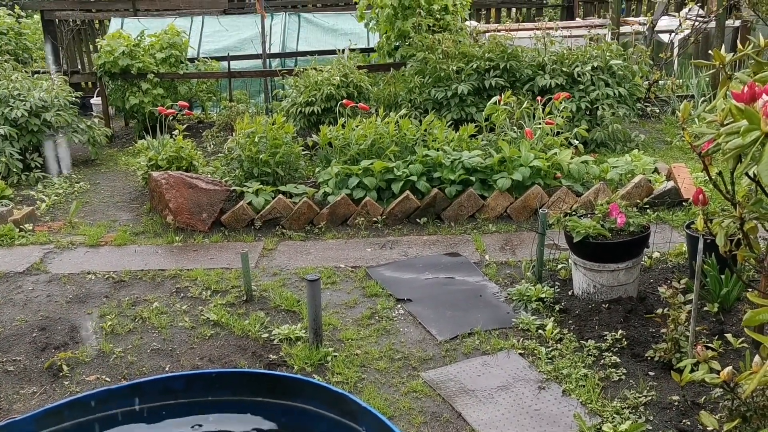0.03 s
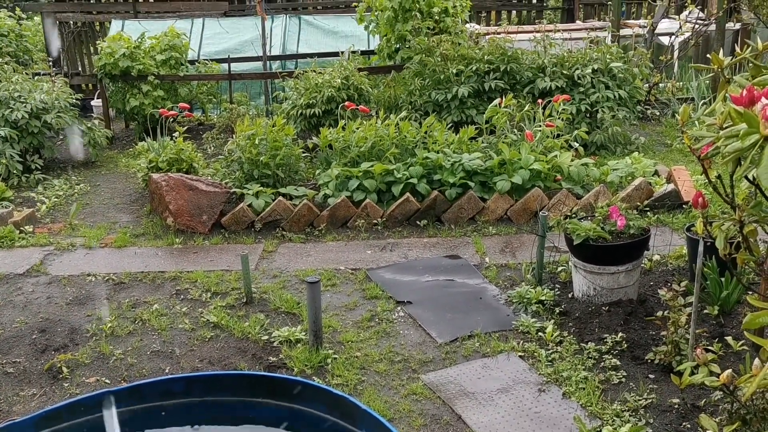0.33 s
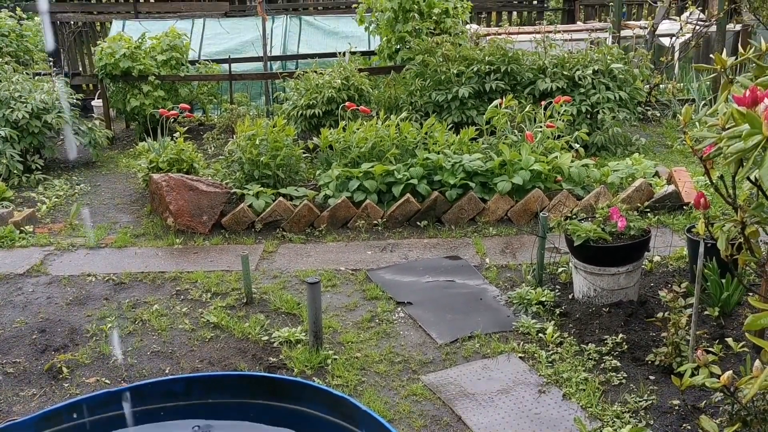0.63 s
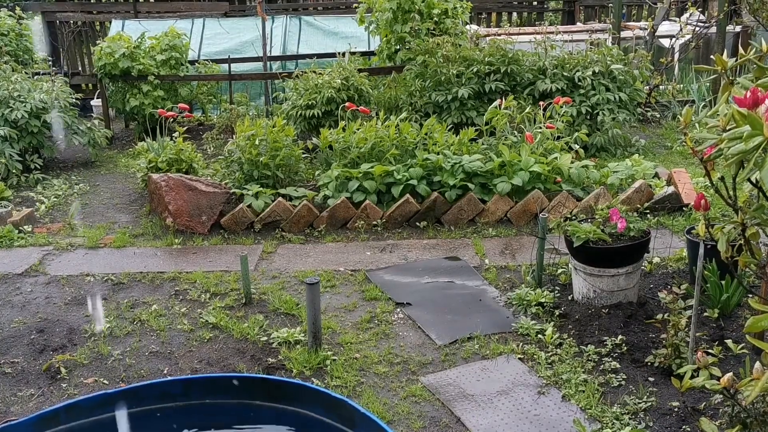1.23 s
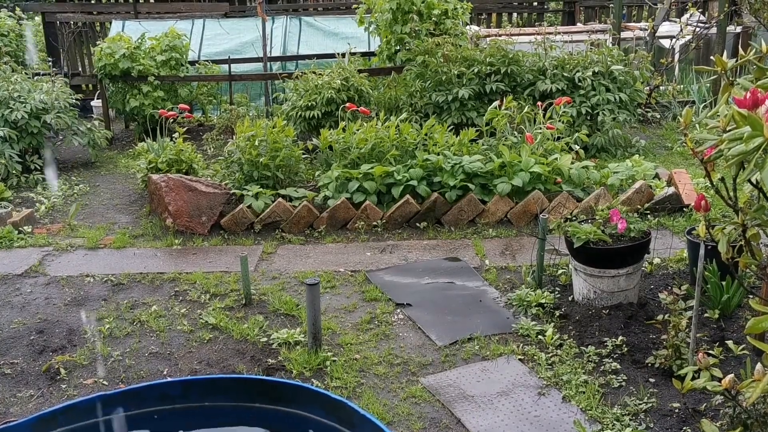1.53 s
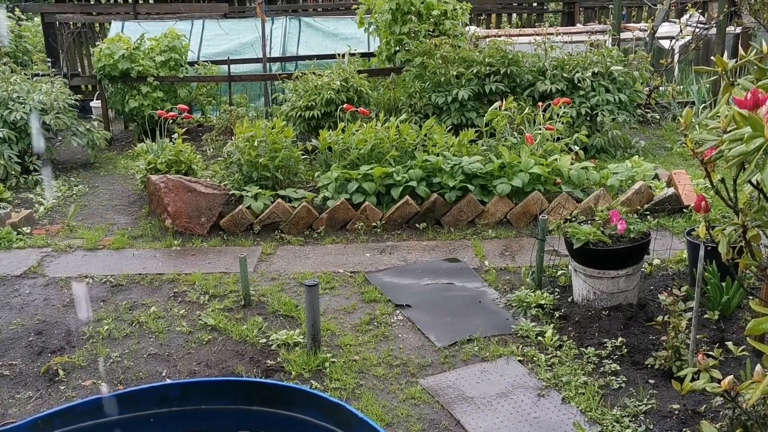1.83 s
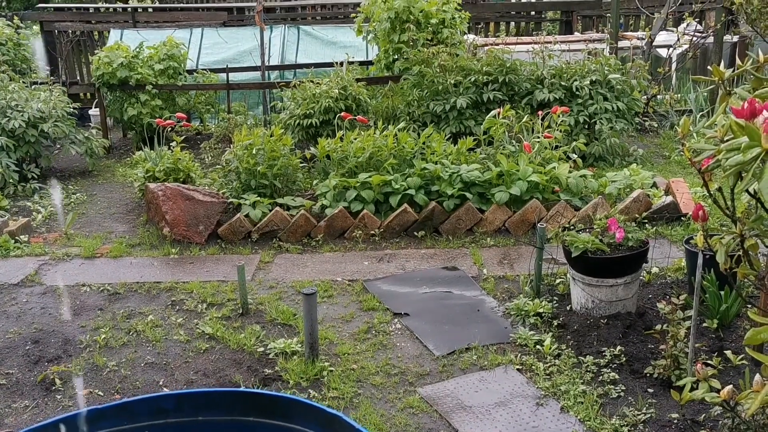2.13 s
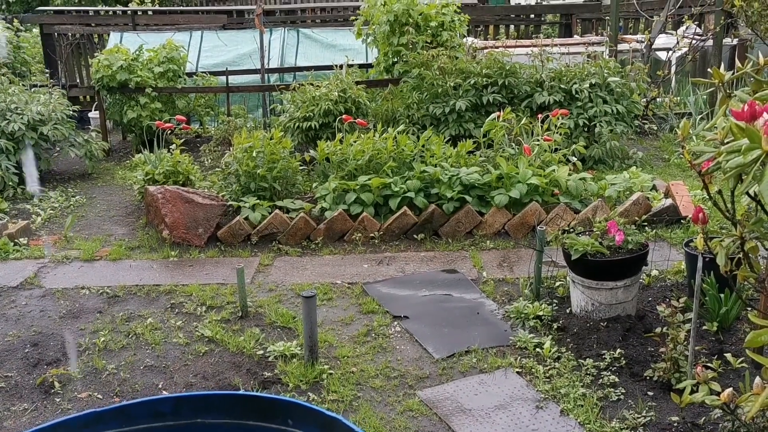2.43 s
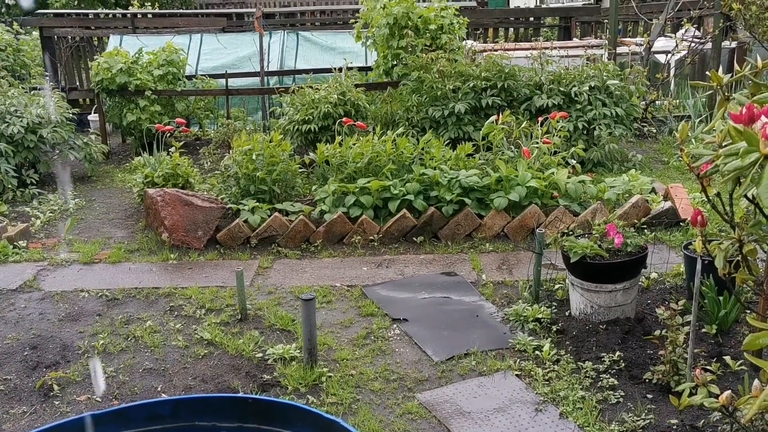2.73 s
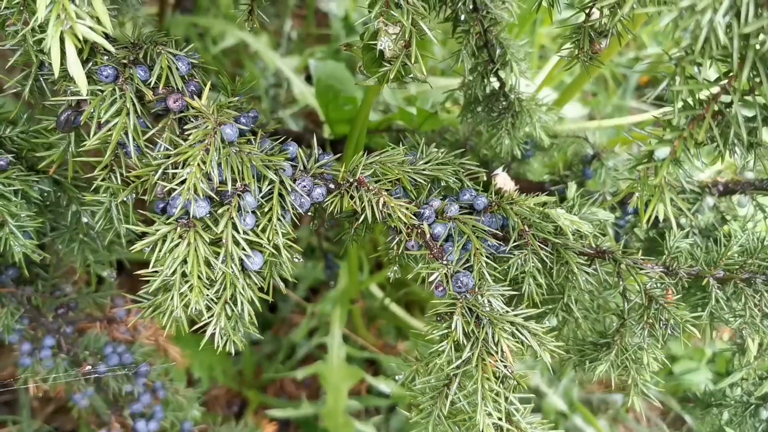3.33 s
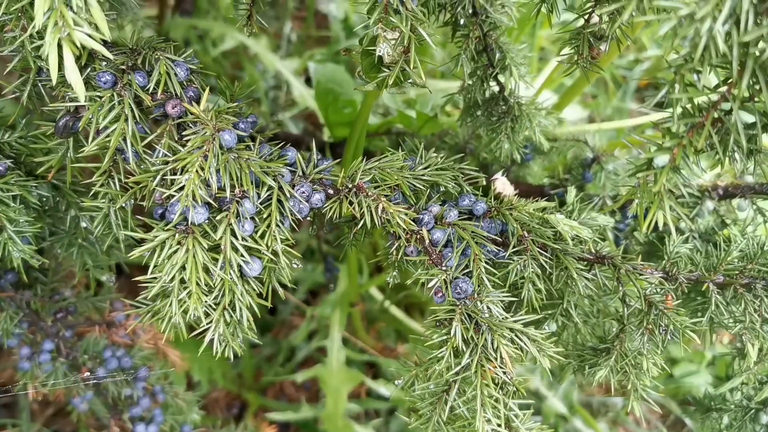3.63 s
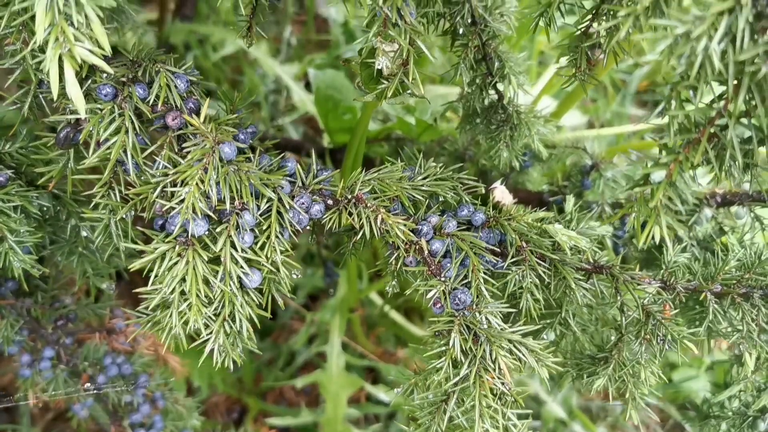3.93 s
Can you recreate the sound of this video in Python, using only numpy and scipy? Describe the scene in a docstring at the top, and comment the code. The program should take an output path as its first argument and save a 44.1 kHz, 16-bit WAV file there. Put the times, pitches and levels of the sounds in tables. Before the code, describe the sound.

Water drips and splatters close by into a full rain barrel, with sharp splashes and small bubbly plops over light garden rain. After a brief silence, soft steady rain patters on shrubs over a low breeze.

```python
"""Sharp, close splashes: roof runoff splatters into a full rain barrel. Each drop is a burst of noise
and the ping of a tiny trapped bubble; larger bubbles plop, mostly bending upward, amid ticks and fine
spray. Light rain and a low outdoor rumble sit behind. Near 3 s it all fades quickly into a short
silence, then soft steady rain on shrubs comes in, mostly to the right: hiss, fine patter and a few
drops pinging on leaves over a low breeze."""
import sys
import numpy as np
from scipy import signal
from scipy.fft import rfft, irfft
from scipy.io import wavfile

SR = 44100
rng = np.random.default_rng(int(sys.argv[2]) if len(sys.argv) > 2 else 0)


def dump(signal):
    """Clip the signal to [-1, 1] and save it as 16-bit WAV at the path in sys.argv[1]."""
    limited = np.clip(np.atleast_2d(signal).T, -1, 1)
    pcm = np.round(limited * 32767).astype(np.int16)
    wavfile.write(sys.argv[1], SR, pcm)


N = 176400
TIME = np.arange(N) / SR

# Full drops on the water: start_s, level_db, bubble_hz, slap_db, splat_db, tick_db, spray_db
# (the last four are frequency bands, low to high, relative to level_db)
BARREL_DROPS = [(0.065, -23.5, 2700, -9.5, -8, -22, -19), (0.1136, -47.5, 2970, 10, -6.5, -6, -3),
                (0.1434, -14.5, 3950, -19, -11, -18, -23), (0.2262, -28.5, 2080, -12.5, -13, -15, -18),
                (0.2902, -17.5, 5500, -24, -18.5, -16, -19), (0.3136, -19, 2650, -14, -15, -18.5, -22),
                (0.3413, -24.5, 2600, -16.5, -27, -20, -14.5), (0.387, -37, 1970, -9, -16, -27, -12),
                (0.485, -26.5, 4070, -13.5, -9, -14, -33), (0.5032, -23, 4760, -14, -12.5, -12.5, -34),
                (0.5229, -32, 2320, -4.5, -13, -25, -28), (0.6065, -27.5, 2660, -5.5, -25, -13.5, -18),
                (0.6235, -27.5, 2560, -13, -10.5, -18, -18), (0.638, -29.5, 2310, -14.5, -14, -27, -8),
                (0.683, -26, 2570, -7, -22, -33, -6), (0.7051, -31.5, 2390, -2, -26, -22, -18),
                (0.711, -31, 3360, -16, -6, -9, -13), (0.7333, -20.5, 3370, -30.5, -31, -16, -13.5),
                (0.7732, -25.5, 5100, -22.5, -16, -11, -14), (0.7912, -26.5, 3320, -9, -11, -13, -13.5),
                (0.8154, -27.5, 2550, -14, -20, -12, -12.5), (0.8826, -22, 4010, -13, -10, -31, -15.5),
                (0.903, -26, 3980, -24, -9.5, -10.5, -15), (0.9236, -25, 3470, -11, -8.5, -34, -18),
                (0.962, -27, 1480, -12, -26, -25.5, -13.5), (0.971, -25.5, 2390, -15, -14, -5.5, -20),
                (1.0165, -19, 3350, -22, -18.5, -15.5, -16), (1.0691, -35.5, 2490, -2.5, -29, -16, -9),
                (1.118, -21, 2620, -16, -27, -19, -12.5), (1.2077, -29.5, 2250, -6.5, -9, -9, -22),
                (1.2198, -28.5, 3450, -13.5, -10, -4.5, -9), (1.2411, -38.5, 3360, -15, 0.5, 0, -5),
                (1.267, -32, 4070, -18, -10, -13, -10), (1.316, -28, 4100, -14, -31, -3.5, -16),
                (1.4635, -33.5, 2200, -3, -1, -7, -27), (1.484, -33.5, 2600, -2.5, -12, -5.5, -20),
                (1.5198, -40, 3390, -19, 2.5, -26, -25), (1.5793, -30.5, 2450, -5.5, -5.5, -7.5, -12),
                (1.602, -23, 2350, -6, -15, -27, -20), (1.6133, -31, 4660, -17, -12, -10, -11),
                (1.734, -20, 3440, -34.5, -18, -12, -12), (1.7781, -11.5, 4380, -52.5, -26, -18, -17.5),
                (1.8333, -30, 2600, -12.5, -11.5, -15, -18),
                (1.8978, -30.5, 2950, -7.5, -40.5, -9.5, -11.5), (1.9424, -21.5, 4470, -35, -15, -16, -20),
                (1.9855, -27.5, 5140, -14.5, -13.5, -13.5, -13),
                (2.1022, -28, 2500, -16, -16.5, -10.5, -26), (2.335, -22, 5070, -24.5, -37, -10.5, -17),
                (2.3733, -30.5, 3610, -37, -38, -3, -14), (2.443, -32.5, 3000, -9.5, -11, -18, -11.5),
                (2.5111, -30, 3740, -9, -37.5, -5.5, -9.5), (2.5286, -10.5, 2860, -34, -22.5, -32, -28.5),
                (2.5645, -36, 4590, -4.5, -4, -11.5, -26), (2.6021, -24, 5260, -23, -13.5, -10.5, -18.5),
                (2.702, -29.5, 2360, -20, -30.5, -10, -10), (2.7648, -19.5, 3550, -37.5, -12.5, -51, -15),
                (2.7864, -23.5, 2480, -13, -26.5, -25, -26), (2.835, -30, 4410, -15, -5.5, -12.5, -19),
                (2.8559, -24, 1655, -8, -23, -11.5, -28), (2.871, -40, 2500, -8, -15, -16, -28),
                (2.8823, -27.5, 4650, -26, -12.5, -9.5, -14), (2.9138, -30.5, 5210, -34, -11.5, -6.5, -11)]
# Slap, splat, tick and spray bands: low_hz, high_hz
BURST_BANDS = [(1500, 3000), (3000, 5500), (5500, 9000), (9000, 16000)]
# Decay of the burst, one per band: fall_s
BURST_FALLS = [0.0006, 0.0061, 0.0028, 0.0024]
# Droplets falling back after a burst, one per band: relative_db
SPATTER_LEVELS = [-4.5, -9.5, -14.5, -13.5]
# Colour of the splashing at each ear: frequency_hz, left_db, right_db
SPLASH_EQ = [(394, -9, -7), (770, -3, 2.5), (1180, -9, -13), (1776, -14, -9), (2076, -7.5, -2.5),
             (2450, -21.5, 0), (3100, -7.5, -0.5), (3557, -1.5, 3.5), (4520, -6.5, -4), (5320, -20.5, -5),
             (6105, -8.5, -23), (6940, -6, 8.5), (7450, -5, -16), (8550, -4, -12), (9470, -15, -11.5),
             (11290, -20, -4), (12670, -12.5, 0.5), (13100, -19.5, -13), (14260, -25, -3),
             (16400, -20, -16), (16040, -38.5, -31)]
# Clear plinks of the hardest drops: start_s, level_db, pitch_hz, decay_cycles
HARD_DROPS = [(0.146, -0.5, 3970, 3.1), (.775, -27, 5230, 11), (1.068, -28.5, 3300, 11),
              (1.7791, -11, 6920, 7.3), (1.9441, -22, 4460, 8.2), (2.53, -13, 2770, 11.8),
              (2.765, -15, 3840, 7.5)]
# Larger bubbles rising: start_s, pitch_hz, level_db, life_s, rise_octaves
BUBBLES = [(.067, 772, -39.5, 0.032, .02), (.257, 900, -42, 0.026, 0.37), (0.263, 1563, -30.5, 0.012, 0.64),
           (.404, 425, -37.5, 0.037, 0.22), (.452, 650, -43, 0.039, 1.27), (.502, 1030, -42, 0.017, .05),
           (.556, 754, -40.5, 0.037, 0.31), (.58, 668, -28, 0.01, 1.33), (.802, 754, -45.5, 0.026, 0.12),
           (.931, 652, -43, 0.025, 1.06), (1.085, 574, -48, 0.041, 1.14), (1.266, 214, -39, 0.025, -0.11),
           (1.316, 689, -38.5, 0.023, 0.41), (1.343, 743, -36, 0.015, .7), (1.499, 645, -41.5, 0.055, 0.09),
           (1.7928, 1120, -25, 0.0014, 0.56), (1.819, 810, -38.5, 0.028, -0.03),
           (2.045, 654, -45.5, 0.028, 0.4), (2.131, 645, -41.5, 0.036, 1.05),
           (2.203, 640, -34.5, 0.019, 0.95), (2.334, 530, -40.5, 0.014, -.1),
           (2.36, 494, -48.5, 0.051, 0.68), (2.444, 747, -46, 0.04, 0.092), (2.523, 749, -43, 0.042, 0.28),
           (2.649, 1360, -48, 0.019, 0.57), (2.859, 1240, -26, 0.0032, 0.29),
           (2.879, 782, -42, 0.029, 0.12)]
# Small droplets that trap no bubble: start_s, tick_db, spray_db
SMALL_DROPS = [(0.0744, -47.0, -35), (0.1931, -36, -44), (0.2726, -38.5, -50), (0.4136, -39.5, -40.5),
               (0.5873, -38.5, -45), (0.9825, -49, -42.5), (1.0243, -36.5, -42.5), (1.0437, -40.5, -42),
               (1.0885, -38, -39), (1.1197, -46, -39), (1.285, -41, -43), (1.3437, -43, -39),
               (1.3567, -39, -47), (1.3765, -46.5, -45), (1.4043, -38, -45.0), (1.443, -43.5, -48),
               (1.659, -42.5, -47.0), (1.687, -37, -35), (1.7197, -41, -47), (1.7505, -37.0, -34.5),
               (1.91, -40, -38.5), (1.977, -35.5, -42.5), (2.0022, -40.5, -43.5), (2.204, -39, -39.5),
               (2.254, -37, -38.5), (2.3194, -46, -42), (2.3478, -44, -45.5), (2.428, -42.5, -41.5),
               (2.4737, -42.5, -42), (2.4864, -52.5, -41), (2.7184, -37.5, -40)]
# Activity of the fine spray: time_s, level_db
SPRAY_ENVELOPE = [(0, -44.5), (.35, -51), (.8, -45.5), (1.05, -46), (1.5, -44), (1.78, -49), (2.1, -51),
                  (2.36, -58), (2.55, -43.5), (2.9, -49)]
# Brief sheets of spray: start_s, length_s, level_db
SPRAY_SHEETS = [(0, 0.13, -46.5), (0.455, 0.056, -48)]
# Single drops on leaves: start_s, relative_db, pitch_hz
LEAF_HITS = [(3.344, -33, 4700), (3.4214, -39, 3090), (3.564, -38.5, 3020), (3.717, -37, 4360)]
# Tone of the rain on shrubs, breeze, light rain and rumble: frequency_hz, relative_db
SHRUBS_EQ = [(180, -22), (300, -1), (390, -9.5), (593, -1.5), (1750, -8.5), (3240, -6.5), (3830, -9),
             (4750, -5), (6740, -20.5), (8500, -21), (10000, -29), (14700, -22.5), (16000, -31)]
BREEZE_EQ = [(12, -31), (20, -1.5), (46, 0), (86, -13.5), (147, -15), (331, -36), (400, -40), (520, -65),
             (880, -120)]
LIGHT_RAIN_EQ = [(180, -30.5), (300, 5), (455, -1), (787, 1), (1210, -1), (2570, 0), (3190, -9),
                 (6100, -5.5), (6850, -6), (9550, -15.5), (12500, -11.5), (15000, -8), (16000, -25)]
RUMBLE_EQ = [(12, -39.5), (20, -3.5), (64, 5), (120, -5.5), (177, -12), (206, -7), (380, -24), (520, -48.5),
             (880, -120)]
# Where those beds sit: frequency_hz, left_minus_right_db
SHRUBS_BALANCE = [(300, 0), (800, -5.5), (1300, -3), (2000, -8.5), (3300, -16), (5200, -21), (6400, -5),
                  (7500, 5.5), (11500, 2), (13000, -6), (15000, -2)]
BREEZE_BALANCE = [(30, 4.8), (120, 3.9), (400, 1)]
GARDEN_BALANCE = [(30, 3), (120, 3.5), (300, -2.5), (1000, -2), (2500, -9.5), (5000, -5), (8500, 2.5),
                  (12000, -3.5)]
# Rain on shrubs and breeze easing off: time_s, level_db
SHRUBS_ENVELOPE = [(3.26, -51.5), (3.472, -55)]
BREEZE_ENVELOPE = [(3.26, -42), (3.87, -44.5), (4.0, -48)]
# Stereo width of the beds: frequency_hz, left_right_correlation
BED_LIKENESS = [(150, 1), (300, 0.96), (600, 0.29), (1200, -0.61), (2500, 0.19), (8000, -0.18)]

SPLASH_LIKENESS, SPLASH_PAN_DB = .75, -11   # left-right correlation; negative pans go right
EAR_LEAD_S = np.array([[.00018], [0]])   # the left ear hears it first
SPLASH_PEAK_S = .002   # from a drop's start to its crack


def splashes():
    """Each full drop bursts on the water and leaves a tiny ringing bubble; the hardest add a plink."""
    drops = np.array(BARREL_DROPS)
    out = bursts(drops[:, 0], drops[:, 1] + drops[:, 3:].T)
    for start_s, db, hz, slap_db, splat_db in drops[:, :5]:
        band_db = slap_db - 3 if hz < BURST_BANDS[0][1] else splat_db   # slaps ring less than splats
        ring = from_db(db + band_db + 13.5) * ping(hz, cycles=6.5)
        add(out, start_s + SPLASH_PEAK_S, panned(SPLASH_PAN_DB) * ring)
    for start_s, db, hz, cycles in HARD_DROPS:
        add(out, start_s, from_db(db) * panned(SPLASH_PAN_DB) * ping(hz, cycles))
    return out


def bursts(starts_s, bands_db):
    """A drop cracks on contact, bursts and spatters back, with its own level in each of four bands."""
    size, lead_s = 2048, .004
    rise_s, crack_s, spatter_s = .0009, .00017, .015
    t = TIME[:size] - lead_s
    attack = np.exp(np.minimum(t / rise_s, 0))
    after = np.maximum(t, 0)
    crack = from_db(-3.5) * np.exp(-np.abs(t) / crack_s)
    noise = pair(rng.standard_normal((len(starts_s), 2, size)).swapaxes(0, 1), SPLASH_LIKENESS)
    stretch = 2 ** (.022 * rng.standard_normal((len(starts_s), 1)))   # detunes each drop's colour
    hits, out = 0, np.zeros((2, N))
    for k, band in enumerate(BURST_BANDS):
        spatter = from_db(SPATTER_LEVELS[k]) * np.exp(-after / spatter_s)
        envelope = crack + attack * (np.exp(-after / BURST_FALLS[k]) + spatter)
        bandpass = signal.butter(2 if k == 0 else 3, band, "band", fs=SR, output="sos")
        layer = signal.sosfilt(bandpass, splash_tone(noise * envelope, stretch))
        rms = np.sqrt((layer.mean(0) ** 2).sum(-1) / (.005 * SR))   # as if packed into 5 ms
        hits = hits + layer * (from_db(bands_db[k]) / rms)[:, None]
    for k, start_s in enumerate(starts_s):
        add(out, start_s + SPLASH_PEAK_S - lead_s, hits[:, k])
    return out


def ping(hz, cycles):
    """A tiny resonance dies within a few cycles while its pitch creeps up."""
    t, rise_octaves_per_s = TIME[:SR // 50], 8.5
    phase = np.cumsum(hz * 2 ** (rise_octaves_per_s * t)) / SR + hz * EAR_LEAD_S
    return np.sin(2 * np.pi * phase) * np.exp(-t * hz / cycles) * (1 - np.exp(-t * hz / 2))


def splash_tone(x, stretch=1):
    """Colour the splashing for each ear, the left slightly early; stretch shifts the resonances."""
    hz = np.fft.rfftfreq(x.shape[-1], 1 / SR)
    ears = []
    for ear in range(2):
        colour = from_db(at_hz(SPLASH_EQ, hz * stretch, column=ear + 1))
        lead = np.exp(2j * np.pi * hz * EAR_LEAD_S[ear])
        ears.append(irfft(rfft(x[ear]) * colour * lead, x.shape[-1]))
    return np.array(ears)


def ticks():
    """Small droplets tick brightly on the surface, with little body and no bubble."""
    starts_s, tick_db, spray_db = np.transpose(SMALL_DROPS)
    slap_db, splat_db = tick_db - 24, tick_db - 11.5
    return bursts(starts_s, [slap_db, splat_db, tick_db, spray_db])


def plops():
    """Bubbles pinch off with a knock and ring, most bending upward as they rise through churning water."""
    attack_s, knock_fall_s, droop_db = .00069, .0018, 1
    out = np.zeros((2, N))
    churn = signal.sosfilt(signal.butter(2, 130, fs=SR, output="sos"), rng.standard_normal((2, N)))
    churn = .24 * churn / churn.std()
    knock_band = signal.butter(2, (400, 2000), "band", fs=SR, output="sos")
    knock_noise = unit(signal.sosfilt(knock_band, pair(rng.standard_normal((2, N)), SPLASH_LIKENESS)))
    for start_s, hz, db, life_s, rise_octaves in BUBBLES:
        t = TIME[:int(life_s * SR) + 2]
        age = t / t[-1]
        span = slice(int(start_s * SR), int(start_s * SR) + len(t))
        flutter, wobble = churn[:, span]   # the churn shakes level and phase
        pitch = hz * 2 ** (rise_octaves * age ** 1.7)   # holds the note, then bends
        phase = np.cumsum(pitch) / SR + pitch * EAR_LEAD_S
        envelope = (1 - np.exp(-t / attack_s)) * from_db(db - droop_db * age) * (1 - age ** 4)
        note = envelope * (1 + flutter) * np.sin(2 * np.pi * phase + wobble)
        knock = from_db(-42) * np.exp(-t / knock_fall_s) * knock_noise[:, span]
        add(out, start_s, panned(-4) * (note + knock))
    return barrel_echo(out)


def barrel_echo(x):
    """The barrel wall throws back a short, dense echo."""
    t, t60_s, wet_db = TIME[:SR // 10], .09, -8.5
    tail = rng.standard_normal((2, len(t))) * np.exp(-np.log(1000) * t / t60_s)
    tail /= np.linalg.norm(tail[0])
    return x + from_db(wet_db) * signal.fftconvolve(x, tail, axes=1)[:, :N]


def spray():
    """Fine droplets and a fizz of small bubbles fill the gaps between splashes."""
    activity = level(SPRAY_ENVELOPE)
    droplets = unit(splash_tone(patter(per_s=300, spread_db=4, fall_s=.0022)))
    sizes = impacts(per_s=100, spread_db=-.5)
    pitch_hz = 3200 * 2 ** rng.normal(0, .391, N)
    pan_db = rng.normal(SPLASH_PAN_DB, 6.3, N)
    fizz = np.zeros((2, N))
    for i in np.flatnonzero(sizes):
        add(fizz, i / SR, sizes[i] * panned(pan_db[i]) * ping(pitch_hz[i], cycles=4))
    return activity * (from_db(-3.5) * droplets + from_db(-56.5) * unit(fizz) / activity.mean())


def sizzles():
    """A sheet of fine spray hisses briefly in a narrow band."""
    hiss = unit(signal.lfilter(*signal.iirpeak(4230, Q=3.1, fs=SR), rng.standard_normal((2, N))))
    swell = np.zeros(N)
    for start_s, length_s, db in SPRAY_SHEETS:
        arch = 1 - (2 * (TIME - start_s) / length_s - 1) ** 2
        swell += from_db(db) * np.sqrt(np.clip(arch, 0, 1))
    return hiss * swell * panned(SPLASH_PAN_DB)


def shrubs():
    """Rain on shrubs: soft hiss, fine patter and a few nearer drops on leaves, over a rumbling breeze."""
    hiss, low = rng.standard_normal((2, 2, N))
    grain = unit(patter(per_s=500, spread_db=6.5, fall_s=.0014))
    rain = bed(unit(hiss) + from_db(-4.5) * grain, SHRUBS_EQ, SHRUBS_BALANCE)
    breeze = bed(low, BREEZE_EQ, BREEZE_BALANCE)
    out = from_db(-.5) * level(SHRUBS_ENVELOPE) * rain + level(BREEZE_ENVELOPE) * breeze
    for start_s, db, hz in LEAF_HITS:
        add(out, start_s, from_db(db + 5) * panned(-20) * ping(hz, cycles=2.6))
    return out


def garden():
    """Light rain all round the barrel and a low outdoor rumble."""
    hiss, low = rng.standard_normal((2, 2, N))
    rain = from_db(-52) * bed(hiss, LIGHT_RAIN_EQ, GARDEN_BALANCE)
    rumble = from_db(-44.5) * bed(low, RUMBLE_EQ, GARDEN_BALANCE)
    return rain + rumble


def bed(noise, eq, balance):
    """Shape noise into an ambience bed with steep band edges, width and placement; centre rms 1."""
    hz = np.fft.rfftfreq(N, 1 / SR) + 1e-3
    low_hz, high_hz = .85 * eq[0][0], eq[-1][0]
    edges = 1 / np.sqrt((1 + (low_hz / hz) ** 8) * (1 + (hz / high_hz) ** 12))
    spectrum = pair(rfft(noise), at_hz(BED_LIKENESS, hz))
    return unit(irfft(spectrum * from_db(at_hz(eq, hz)) * edges * panned(at_hz(balance, hz)), N))


def patter(per_s, spread_db, fall_s):
    """Each random impact is a very short burst of noise."""
    decay = np.exp(-2 / (fall_s * SR))
    power = signal.lfilter([1], [1, -decay], impacts(per_s, spread_db) ** 2 + 1e-12)
    return np.sqrt(power) * rng.standard_normal((2, N))


def impacts(per_s, spread_db):
    """Random impulses, most near gain 1 and a few up to three times spread_db away."""
    return (rng.random(N) < per_s / SR) * from_db(spread_db * np.minimum(rng.exponential(1, N), 3))


def pair(noise, likeness):
    """Two unrelated noises become left and right with the given correlation."""
    likeness = np.clip(likeness, -.99, .99)
    mid, side = np.sqrt(1 + likeness) * noise[0], np.sqrt(1 - likeness) * noise[1]
    return np.array([mid + side, mid - side])


def panned(pan_db):
    """Left and right gains with mean 1; positive is left."""
    gains = from_db(np.array([[.5], [-.5]]) * pan_db)
    return gains / gains.mean(0)


def from_db(db):
    """Decibels to gain."""
    return 10 ** (np.asarray(db) / 20)


def unit(x):
    """Scale a stereo sound so that its centre has rms 1."""
    return x / np.sqrt(np.mean(x.mean(0) ** 2) + 1e-20)


def level(rows):
    """A fader ride from time_s, level_db rows."""
    return from_db(np.interp(TIME, *np.transpose(rows)))


def at_hz(rows, hz, column=1):
    """Read a table on a log-frequency axis."""
    rows = np.array(rows, float)
    return np.interp(np.log(hz + 1), np.log(rows[:, 0]), rows[:, column])


def add(out, start_s, sound):
    """Mix a short stereo sound in at start_s."""
    i = int(np.clip(start_s * SR, 0, N - 1))
    out[:, i:i + sound.shape[1]] += sound[:, :N - i]


def scene():
    """The barrel, a short silence, then the shrubs."""
    fade_s, silent_s, return_s = 2.928, 2.952, 3.246
    barrel = splashes() + ticks() + plops() + spray() + sizzles() + garden()
    fade_out = np.interp(TIME, [fade_s, silent_s], [1, 0])
    fade_in = np.clip((TIME - return_s) / .0028, 0, 1)
    return barrel * fade_out + shrubs() * fade_in


def record(dry):
    """A steep high cut at 16 kHz."""
    return signal.sosfilt(signal.ellip(10, .1, 80, 16000, fs=SR, output="sos"), dry + 1e-18)


dry = scene()
out = record(dry)
dump(out)
```